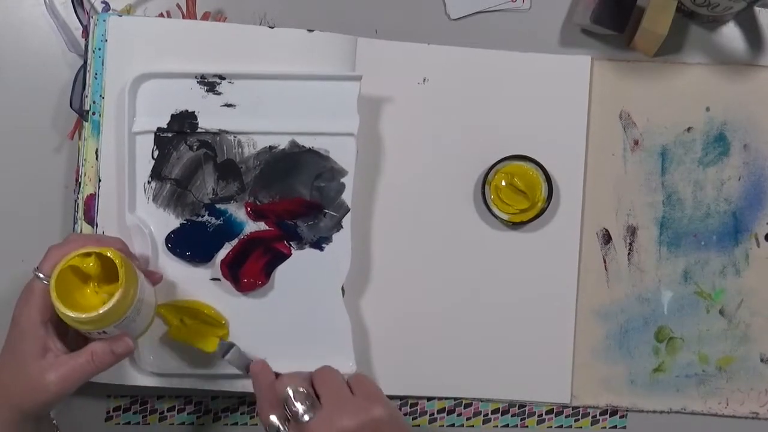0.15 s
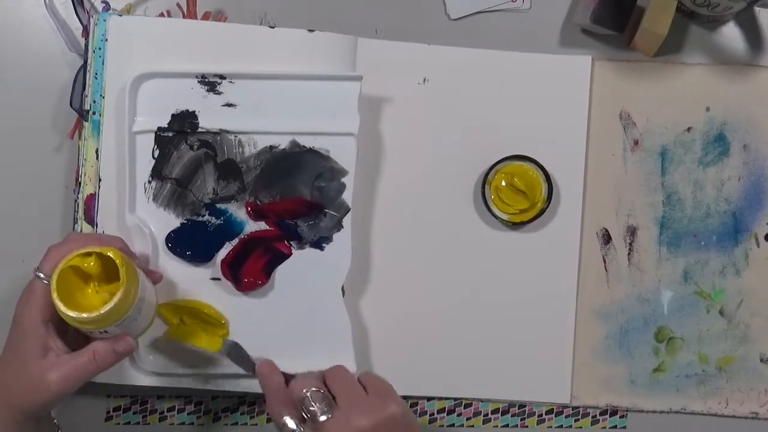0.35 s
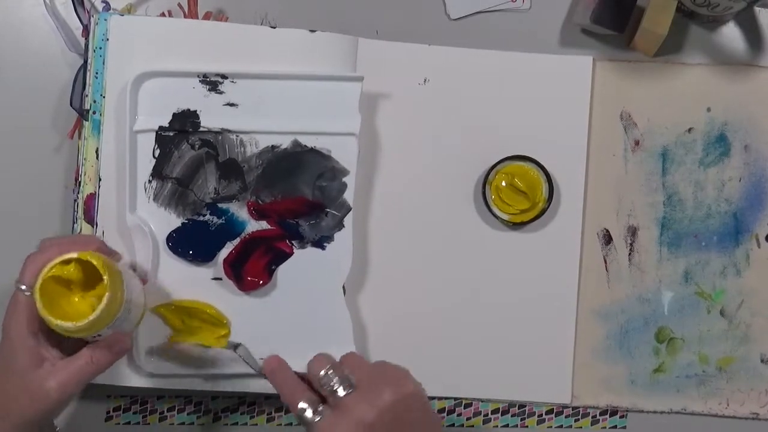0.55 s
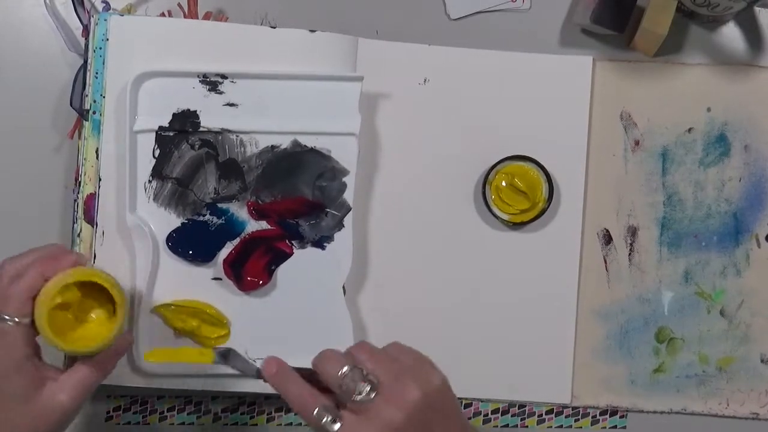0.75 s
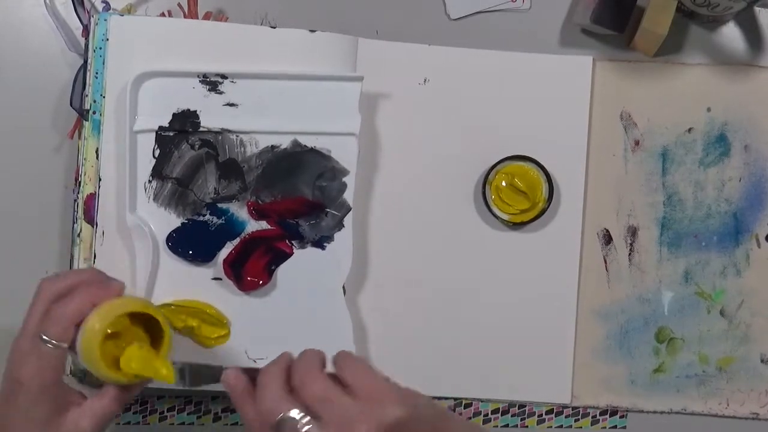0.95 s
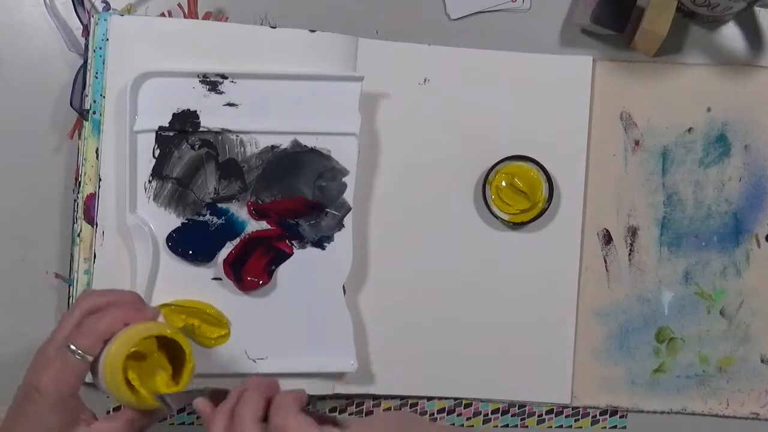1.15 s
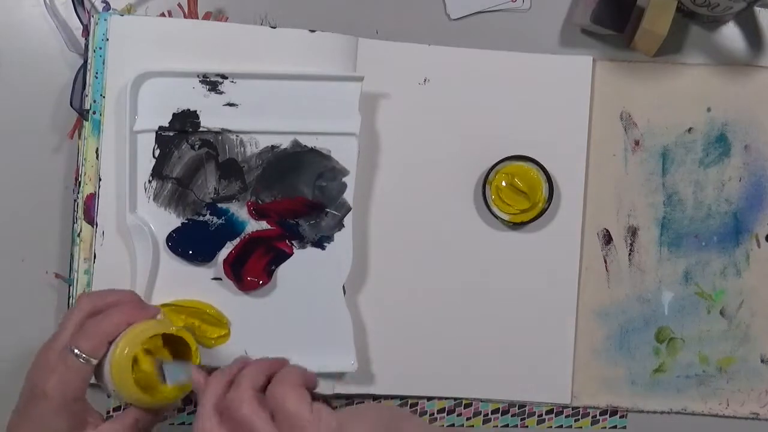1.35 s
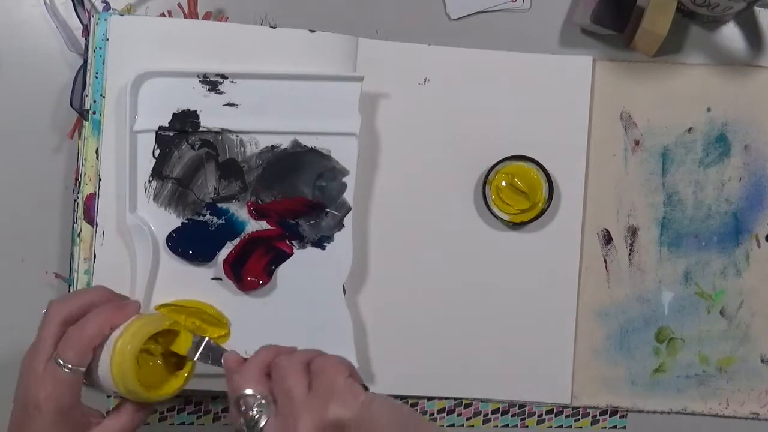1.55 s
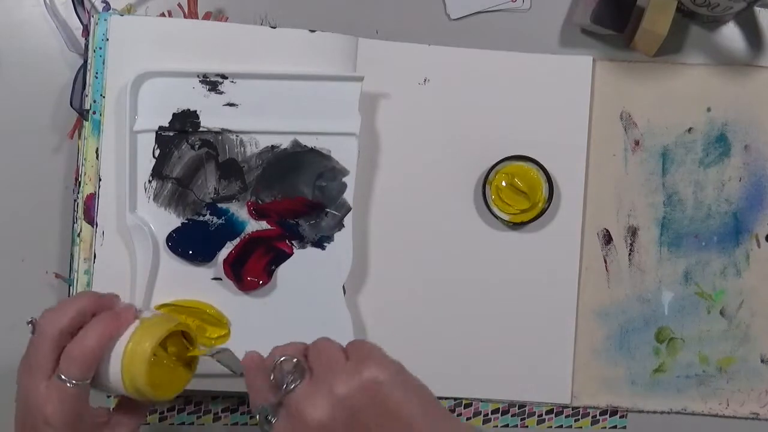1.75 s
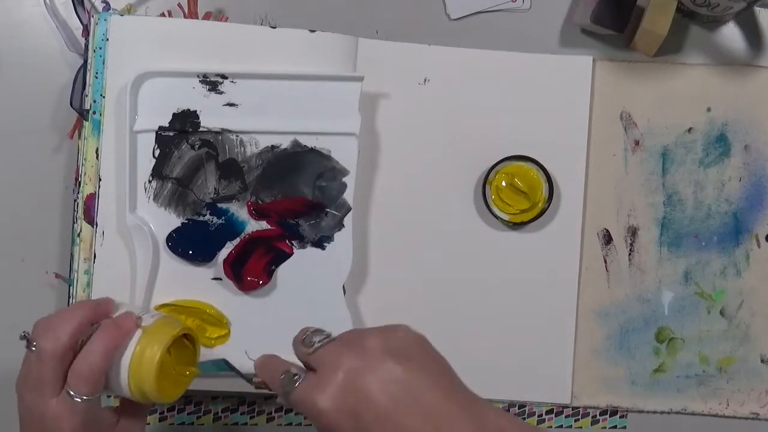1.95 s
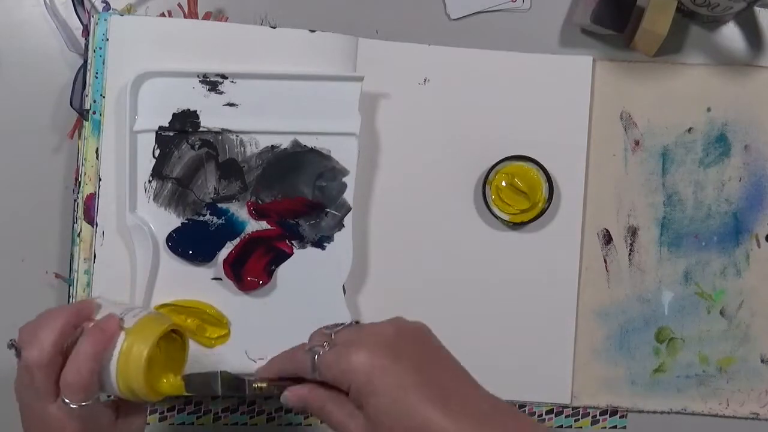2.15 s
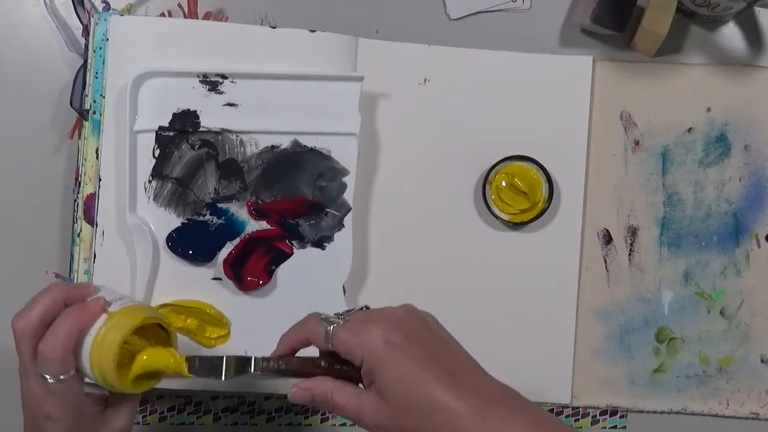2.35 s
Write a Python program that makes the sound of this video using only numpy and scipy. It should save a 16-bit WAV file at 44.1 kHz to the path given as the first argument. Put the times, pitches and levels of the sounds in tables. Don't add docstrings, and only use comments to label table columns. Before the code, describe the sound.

A palette knife taps a plastic palette three times, hard and dry, at about 0.1, 0.26 and 0.43 seconds. A soft slide follows near 0.7. From 1.25 to 1.75 it scrapes a small plastic jar rim, strongest at 1.35 and 1.5, with hollow ringing and ticks, then faint drags until 2.3. Close microphones, short room reverberation, steady low engine hum near 120 hertz, and soft hiss.

```python
import sys
import numpy as np
from scipy import signal
from scipy.fft import rfft, irfft, next_fast_len
from scipy.io import wavfile
from scipy.ndimage import uniform_filter1d, map_coordinates

SR = 44100
rng = np.random.default_rng(int(sys.argv[2]) if len(sys.argv) > 2 else 0)


def amplitude_ratio(level_db):
    exponent = np.asarray(level_db, float) / 20
    return 10 ** exponent


def pcm_store(signal):
    levels = np.round(np.clip(np.atleast_2d(signal), -1, 1) * 32767)
    wavfile.write(sys.argv[1], SR, levels.astype(np.int16).T)


N = 110250


def unit(x):
    return x / np.sqrt(np.mean(x ** 2) + 1e-20)


def along(points, hz):
    f, value = np.transpose(points)
    return np.interp(np.log(hz + 1), np.log(f + 1), value)


def wobble(rate, count=N):
    knots = rng.standard_normal(int(count * rate / SR) + 9)
    return map_coordinates(knots, [np.arange(count) * rate / SR])


def filtered(x, response):
    m = next_fast_len(x.shape[-1] + SR // 4)
    spectrum = rfft(x, m) * response(np.fft.rfftfreq(m, 1 / SR))
    return irfft(spectrum, m)[..., :x.shape[-1]]


def resonance(f, hz, width):
    return 1j * f * width / (hz * hz - f * f + 1j * f * width)


# (time [s], energy [dB])
TAPS = [
    (0.1058, 7),
    (.2648, 8),
    (0.4268, 8),
]
# (frequency [Hz], width [Hz], first tap [dB], second tap [dB], third tap [dB])
PALETTE_MODES = [(344, 93, 3.5, 2.5, 0), (458, 230, -0.5, 1.5, -1), (1234, 140, -2.5, -6.5, -16),
                 (1720, 330, -10, -0.5, -4), (2670, 370, -0.5, 1.5, 1), (3255, 465, -0.5, 5, 1),
                 (4130, 310, 1.5, -0.5, 0.5), (4770, 320, -8, -7, -2.5), (5500, 500, 4.5, 3, 0),
                 (6160, 700, 3, 2.5, 4), (6570, 280, 0, 3, 3.5), (7400, 420, -6, -8, -2.5),
                 (8500, 480, -2, -3, -2), (10400, 590, 2, 1, -1.5)]
SPREAD_S, ROOM_BLUR = .0004, 2.5
CRACK_DB, DAMPING, TAP_LOW_HZ = -14.5, 1.33, 273


def tap_knock(tap, late, blur):
    blow = 1. * (np.arange(SR // 8) == 0)

    def plate(f):
        total = amplitude_ratio(CRACK_DB)
        for (hz, width, *levels), delay in zip(PALETTE_MODES, late):
            mode = resonance(f, hz, blur * DAMPING * width) ** 2
            total = total + amplitude_ratio(levels[tap]) * mode * np.exp(-2j * np.pi * f * delay)
        return total * (1j * f / (TAP_LOW_HZ + 1j * f)) ** 3

    knock = filtered(blow, plate)
    if blur > 1:
        power = uniform_filter1d(np.abs(rfft(knock)) ** 2, size=70)
        pulse = irfft(np.sqrt(np.abs(power)), len(blow))
        knock = np.roll(pulse, 64) * (np.arange(len(blow)) < 256)
    return knock / np.linalg.norm(knock)


def taps():
    out = np.zeros((2, len(TAPS), N + SR))
    for n, (start, db) in enumerate(TAPS):
        late = SPREAD_S * rng.random(len(PALETTE_MODES))
        for row, blur in zip(out[:, n], (1, ROOM_BLUR)):
            knock = tap_knock(n, late, blur)
            row[round(start * SR):][:len(knock)] += amplitude_ratio(db) * knock
    return out[..., :N]


def grit(count):
    clumps_db = 2.2 * wobble(699.7, count) + 0.6 * wobble(71, count)
    return rng.standard_normal(count) * amplitude_ratio(clumps_db)


# (time [s], rise [s], hold [s], fall [s], pressure [dB])
STROKES = [
    (1.297, 0.079, 0.041, 0.027, -33),
    (1.427, 0.013, 0.11, 0.021, -47),
    (1.457, 0.049, 0.01, 0.043, -32.5),
    (1.609, 0.0045, 0.014, 0.031, -44.5),
    (1.661, 0.002, 0.04, 0.034, -42.5),
    (1.716, 0.046, 0.096, 0.02, -53.5),
    (1.87, 0.019, 0.116, 0.026, -52.5),
    (2.036, 0.041, 0.084, 0.013, -52.5),
    (0.659, 0.029, 0.22, .08, -61.5),
]
# (frequency [Hz], width [Hz], level [dB])
GRIPS = [
    [(3590, 180, 1.5), (5520, 100, 8), (6940, 130, -13), (9000, 29, 2), (9840, 110, 3), (10920, 53, 0.5)],
    [(5370, 41, -8), (7150, 51, -5), (9650, 25, 2)],
    [(2560, 150, -1), (3860, 25.1, 10), (5500, 45, 0), (6560, 47, -12), (8730, 49, -15), (10900, 65, -26)],
    [(5400, 34, -25), (6370, 54, -1), (8200, 55, -16), (9870, 32, 3)],
    [(3230, 43, -3.5), (3930, 120, 2), (5300, 35, -24), (6270, 25, 8.5), (7000, 330, -21), (10720, 99, 6)],
    [(5000, 170, -25), (6640, 190, -4), (8450, 38, -34), (10600, 120, -17)],
    [(4770, 73, -20), (6200, 65, -1), (9570, 180, -23), (11030, 64, -24)],
    [(3700, 69, -12), (4650, 63, -8), (5500, 120, -24), (10500, 42, -5)],
    [(1500, 100, -9), (3500, 300, 5), (5500, 300, -1)],
]
STROKE_RANGE_DB = 29
WIDEN_HZ, BROAD_DB, FLICKER_DB = 250, -9, 1.8


def scrapes():
    out, t = np.zeros(N + SR), np.arange(SR // 2) / SR
    for (start, rise, hold, fall, db), peaks in zip(STROKES, GRIPS):
        before, after = (rise - t) / rise, (t - rise - hold) / fall
        short = np.maximum(np.maximum(before, after), 0)
        drive = grit(len(t))
        rub = amplitude_ratio(BROAD_DB) * filtered(drive, lambda f: resonance(f, 4740, 14700) ** 2)
        for k, (hz, width, peak_db) in enumerate(peaks):
            ring = filtered(drive, lambda f: resonance(f, hz, width + WIDEN_HZ))
            flicker = amplitude_ratio(peak_db / 2 + FLICKER_DB * wobble(45.3, len(t)))
            rub = rub + (-1) ** k * flicker * ring
        pressure = amplitude_ratio(np.maximum(db - STROKE_RANGE_DB * short, -140))
        out[round(start * SR):][:len(t)] += pressure * unit(rub)
    return out[:N]


# (time [s], level
# [dB], centre [Hz])
TICKS = [(0.1, -44, 3020), (1.2246, -42, 3260), (1.225, -40, 5500), (1.2255, -46.5, 1614),
         (0.2599, -42, 3000), (1.512, -31, 10300), (1.615, -42, 6370), (1.664, -38, 3100),
         (1.676, -42.5, 1500), (1.708, -52, 3500), (1.665, -40, 6400), (.725, -55, 5000), (.781, -62, 4500),
         (0.851, -49.5, 1500), (1.947, -40, 4400), (1.948, -40, 1200), (2.114, -41, 3700),
         (2.326, -48, 9000)]
TICK_T60_S = .012


def ticks():
    out, t = np.zeros(N + SR), np.arange(1024) / SR
    for start, db, hz in TICKS:
        width = min(.2 * hz, 2000)
        puff = rng.standard_normal(len(t)) * amplitude_ratio(-60 * t / TICK_T60_S)
        puff = filtered(puff, lambda f: resonance(f, hz, width) + .06 * resonance(f, 6000, 8000))
        out[round(start * SR):][:len(t)] += amplitude_ratio(db + 9.0) * puff / np.abs(puff).max()
    return out[:N]


# (time [s], length
# [s], frequency [Hz])
SINGS = [(.84, .09, 1500), (1.257, .07, 1500), (1.3, .1, 286), (1.32, .06, 1580), (1.32, .03, 2700),
         (1.33, .034, 170), (1.345, .028, 7200), (1.35, .03, 3200), (1.38, .048, 1630), (1.381, .014, 5350),
         (1.383, .018, 3600), (1.408, .014, 5300), (1.408, .016, 3450), (1.47, .053, 148),
         (1.478, .03, 2700), (1.505, .023, 3900), (1.51, .03, 8900), (1.512, .03, 1360),
         (1.515, .014, 6200), (1.54, .02, 6100), (1.58, .11, 270), (1.61, .11, 160), (1.614, .022, 6300),
         (1.668, .018, 6250), (1.677, .014, 1070), (1.69, .022, 6600), (1.7, .1, 1160), (1.891, .093, 1220),
         (2.002, .1, 3800), (2.113, .012, 3700), (2.113, .045, 3600), (2.24, .045, 4600),
         (2.285, .035, 4650), (2.285, .03, 6700)]
SINGS_DB = [-62, -54, -52.5, -46, -54, -47, -47, -48, -54, -42, -39, -42, -45.5, -40, -47, -40, -48, -48.5,
            -46.5, -50, -53, -43.5, -51, -47, -38.5, -53, -60, -55, -66.5, -47.5, -54, -67, -59.5, -65]
SING_EDGE_S, SING_WIDTH_HZ = 0.0024, 170
SING_SHARE = .05


def sings():
    lead = SR // 30
    out, t = np.zeros(N + SR), (np.arange(SR // 5) - lead) / SR
    for (start, length, hz), db in zip(SINGS, SINGS_DB):
        outside = np.abs(t - length / 2) - length / 2
        gate = 1 / (1 + np.exp(np.clip(2 * outside / SING_EDGE_S, -50, 50)))
        width = min(max(SING_WIDTH_HZ, SING_SHARE * hz), hz / 5)
        tone = filtered(grit(len(t)), lambda f: resonance(f, hz, width) * resonance(f, hz, 2.5 * width))
        tone = unit(gate * tone) * np.sqrt(np.mean(gate ** 2))
        out[round(start * SR) - lead:][:len(t)] += amplitude_ratio(db) * tone
    return out[:N]


# (delay [s], level [dB])
WALLS = [(.009, -19), (.012, -21), (.0195, -23)]
# (frequency [Hz], t60 [s])
ROOM_T60 = [(300, 0.2), (1500, 0.32), (4000, 0.35), (7000, 0.31), (11000, 0.34)]
# (frequency [Hz], level [dB])
ROOM_COLOUR = [(300, 5.5), (1500, 0.5), (3500, 0), (5500, 1), (8000, 1), (11000, -6)]
# (frequency [Hz], side under mid [dB])
ROOM_SIDE = [(300, -10), (1000, -13), (3000, -16), (6000, -18), (10000, -15)]
ROOM_DB, ROOM_DELAY_S = -3.5, 0.001495


def room(x):
    hz, t, z = signal.stft(rng.standard_normal((2, SR // 2)), SR, nperseg=256)
    decay_db = -60 * t / along(ROOM_T60, hz)[:, None] + along(ROOM_COLOUR, hz)[:, None]
    tail = signal.istft(z * amplitude_ratio(decay_db), SR, nperseg=256)[1]
    tail = amplitude_ratio(ROOM_DB) * tail / np.linalg.norm(tail[0])
    tail = np.pad(tail, ((0, 0), (round(ROOM_DELAY_S * SR), 0)))
    for delay, db in WALLS:
        tail[0, round(delay * SR)] += amplitude_ratio(db + rng.normal(0, 1))
    mid, side = tail[0], filtered(tail[1], lambda f: amplitude_ratio(along(ROOM_SIDE, f)))
    return signal.fftconvolve(x[None], np.array([mid + side, mid - side]), axes=1)[:, :N]


# (frequency [Hz], side under mid [dB])
SIDE_DB = [(60, -18), (170, -13), (490, -14), (1400, -13), (4000, -17), (8600, -13), (11000, -18)]


def rush(spectrum):
    def shape(f):
        return amplitude_ratio(along(spectrum, f)) * np.array([f * 0 + 1, amplitude_ratio(along(SIDE_DB, f))])

    mid, side = filtered(rng.standard_normal((2, N)), shape)
    return unit(np.array([mid + side, mid - side]))


# (time [s], third order [Hz], level [dB])
ENGINE = [(0.0, 123.2, -39), (0.02, 123.0, -42), (.23, 122.3, -34), (.65, 119.3, -36), (.87, 119, -35),
          (.96, 118, -44.5), (1.04, 116.5, -40), (1.25, 116, -41.5), (1.4, 114.5, -49), (1.5, 115, -49.5),
          (1.6, 115, -47), (1.79, 115.1, -39.5), (2.04, 115.1, -47.5), (2.19, 115, -36), (2.25, 115.2, -49),
          (2.5, 115.9, -37.5)]
# (order [per turn], level under the settled third [dB])
ORDERS_DB = [(2, -11.5), (4, -6), (5, -18), (6, -17.5), (7, -20), (8, -22.5)]
# (frequency [Hz], density [dB per Hz])
RUMBLE = [(15, -83), (30, -44), (55, -10.5), (75, -4.5), (120, 1), (155, -2.5), (230, -16), (310, -17),
          (500, -27), (780, -48), (1320, -120)]
# (frequency [Hz], density [dB per Hz])
AIR = [(180, -16.5), (300, -3.5), (486, -8.5), (823, -6.5), (929, -11), (1550, -12.5), (1800, -17),
       (5500, -21), (11000, -26), (14300, -66), (22000, -120)]
# (frequency [Hz], left over right [dB])
LEAN_DB = [(60, 1.5), (350, 1.5), (1990, -1), (11400, 4)]
SETTLED_DB, ORDER_WOBBLE_DB, FIRING_DEPTH = -41.5, 3, 0.16
ORDERS_GROW_DB_PER_S = 6
RUMBLE_DB, AIR_DB, AIR_RISE_DB_PER_S = -43, -53, 0.5


def engine():
    s, hz, db = np.transpose(ENGINE)
    t = np.arange(N) / SR
    turn = 2 * np.pi * np.cumsum(np.interp(t, s, hz)) / 3 / SR
    tone = amplitude_ratio(np.interp(t, s, db) + 1.2 * wobble(11)) * np.sin(3 * turn)
    growth = ORDERS_GROW_DB_PER_S * np.minimum(t - 1.4, 0)
    for order, level in ORDERS_DB:
        order_db = SETTLED_DB + level + growth + ORDER_WOBBLE_DB * wobble(7.03)
        phase = 6 * rng.random() + 0.58 * wobble(5.19)
        tone += amplitude_ratio(order_db) * np.sin(round(order) * turn + phase)
    throb = 1 + FIRING_DEPTH * np.sin(turn)
    rumble = amplitude_ratio(RUMBLE_DB + 0.68 * wobble(3.74)) * throb * rush(RUMBLE)
    air = amplitude_ratio(AIR_DB + AIR_RISE_DB_PER_S * t + 0.46 * wobble(3.9)) * rush(AIR)
    return filtered(np.sqrt(2) * tone + rumble + air,
                    lambda f: amplitude_ratio(np.array([[.5], [-.5]]) * along(LEAN_DB, f)))


def scene():
    (direct, sent), rim = taps(), scrapes() + ticks() + sings()
    near = sum(direct) + rim
    side = filtered(near, lambda f: 1j * amplitude_ratio(-19) + 0 * f)
    shares = (0.64, 0.85, 0.56, 0.34)
    answer = sum(room(x) * share for x, share in zip([*sent, rim], shares))
    return near + side * [[1], [-1]] + answer + engine()


# (frequency [Hz], share of time [0-1])
SIDE_KEPT = [(1300, .95), (2500, .4), (4000, .09), (7000, .09), (8700, .4), (10500, .12)]


def patchy_width(x):
    mid, side = (x[0] + x[1]) / 2, (x[0] - x[1]) / 2
    hz, _, z = signal.stft([mid, side], SR, nperseg=1024)
    band = (np.arange(len(hz)) / 12).astype(int)
    luck = rng.standard_normal((band.max() + 1, z.shape[2] // 2 + 1))
    luck = np.repeat(luck, 2, 1)[:, :z.shape[2]]
    luck = uniform_filter1d(luck, size=5, axis=1)
    rank = luck.ravel().argsort().argsort().reshape(luck.shape) / luck.size
    power = (np.abs(z[0, len(hz) // 10:]) ** 2).sum(0)
    attack = power > 11 * np.roll(power, 2)
    kept = (rank[band] < along(SIDE_KEPT, hz)[:, None]) | attack
    side = signal.istft(z[1] * kept, SR, nperseg=1024)[1][:N]
    return np.array([mid + side, mid - side])


def band_limit(x):
    return signal.sosfilt(signal.butter(12, 12040, fs=SR, output="sos"), x)


def record(dry):
    x = filtered(dry, lambda f: amplitude_ratio(np.maximum(-85 * np.maximum(f - 11000, 0) / 1000, -42)))
    return band_limit(patchy_width(x))


dry = scene()
out = record(dry)
pcm_store(out)
```